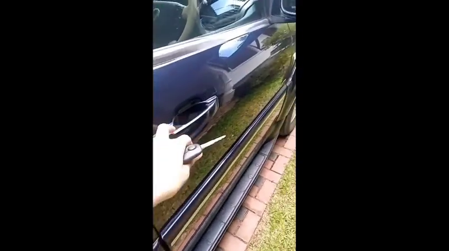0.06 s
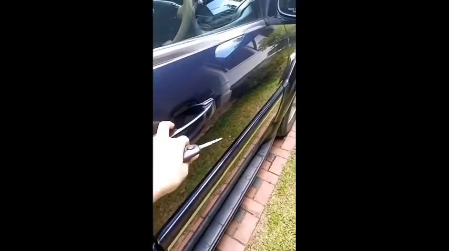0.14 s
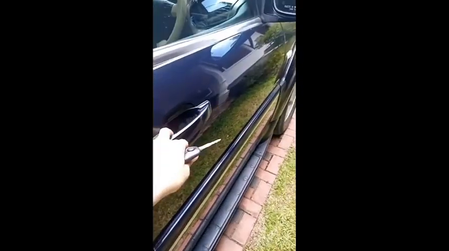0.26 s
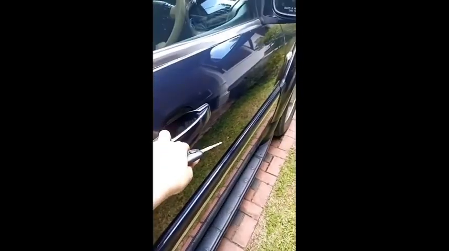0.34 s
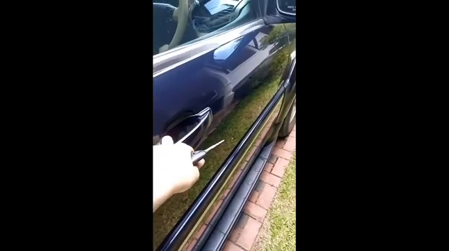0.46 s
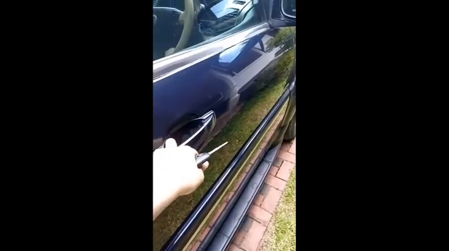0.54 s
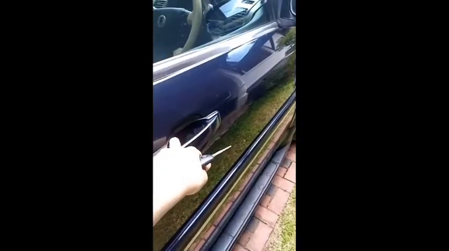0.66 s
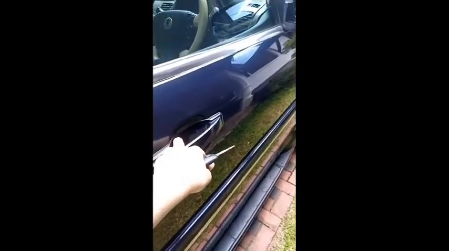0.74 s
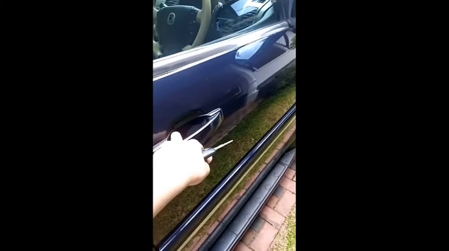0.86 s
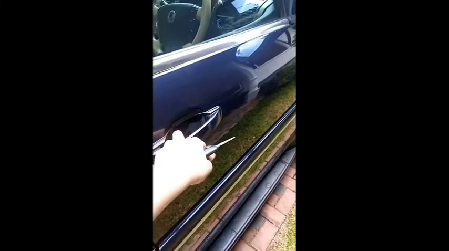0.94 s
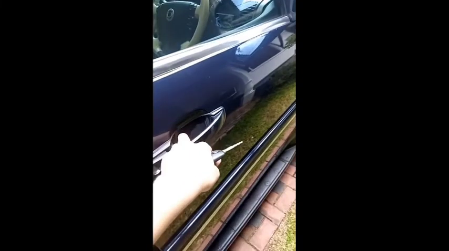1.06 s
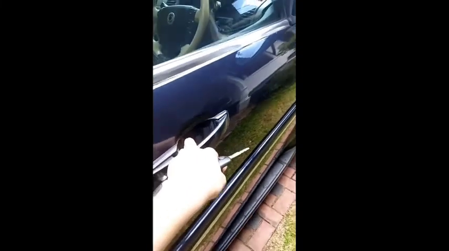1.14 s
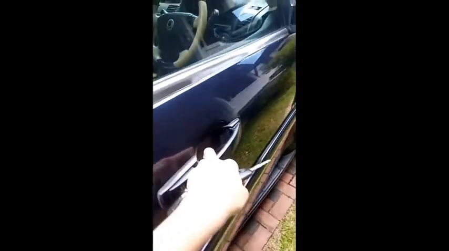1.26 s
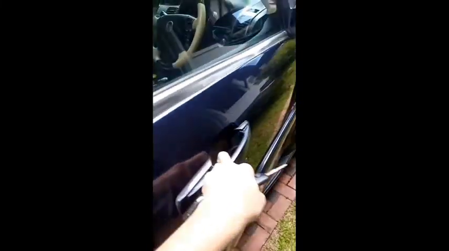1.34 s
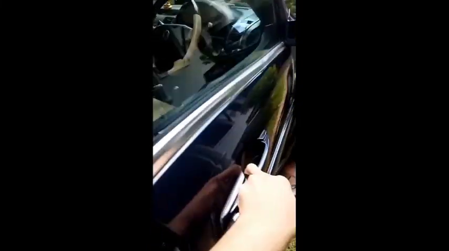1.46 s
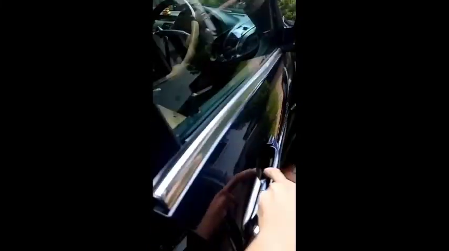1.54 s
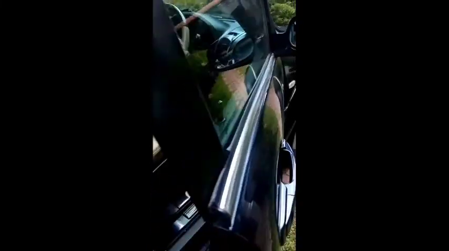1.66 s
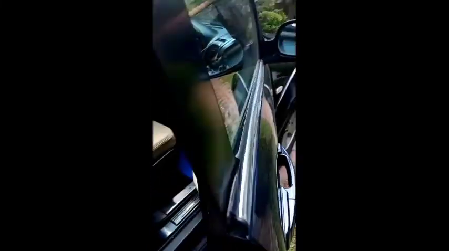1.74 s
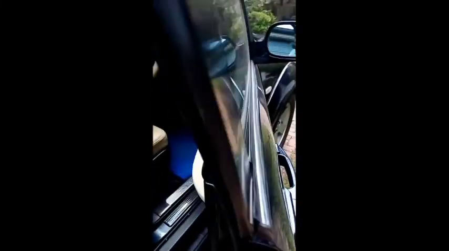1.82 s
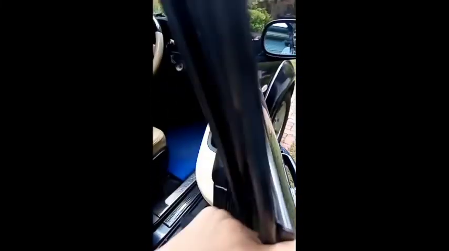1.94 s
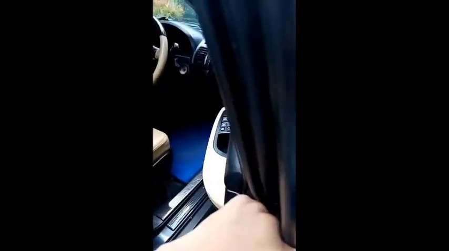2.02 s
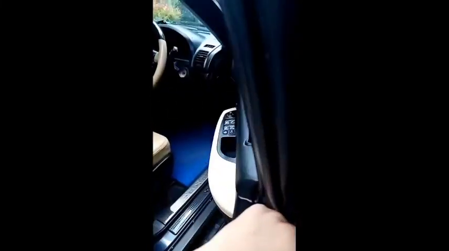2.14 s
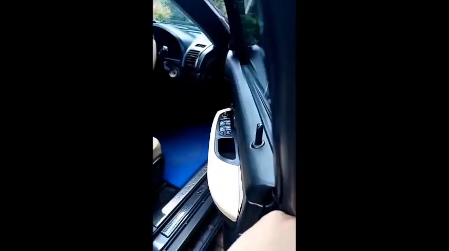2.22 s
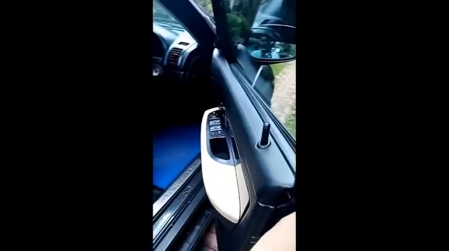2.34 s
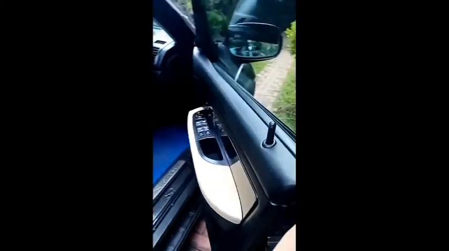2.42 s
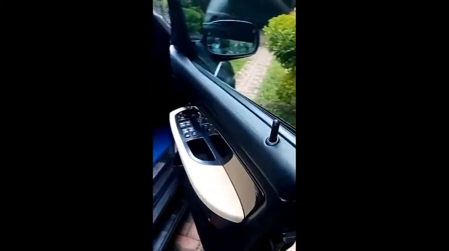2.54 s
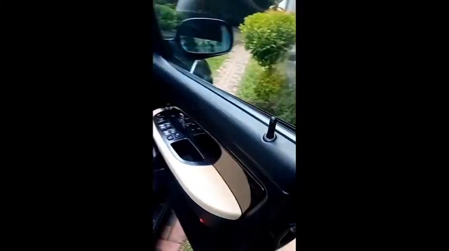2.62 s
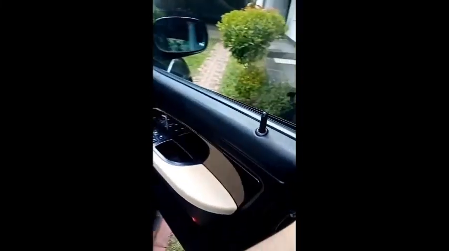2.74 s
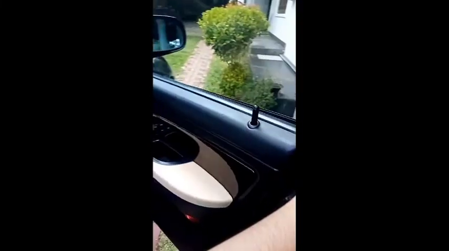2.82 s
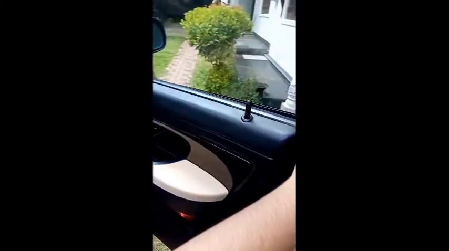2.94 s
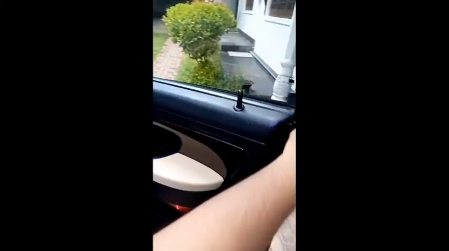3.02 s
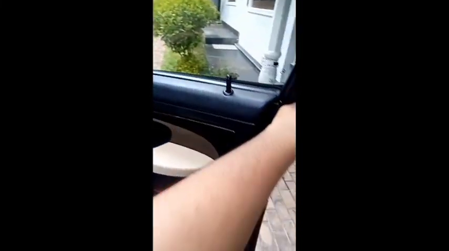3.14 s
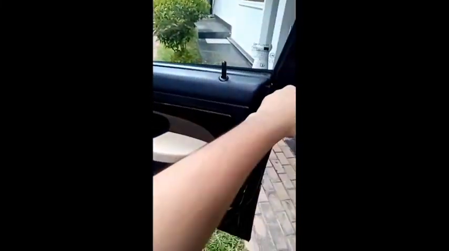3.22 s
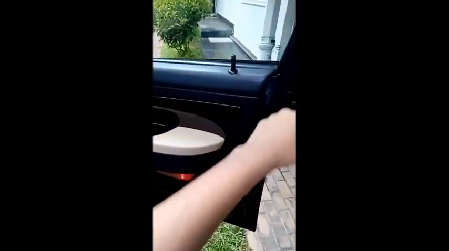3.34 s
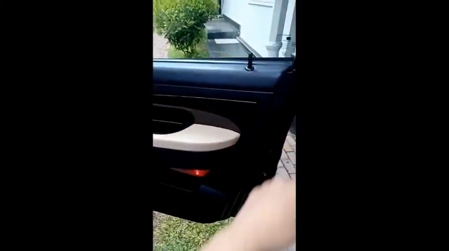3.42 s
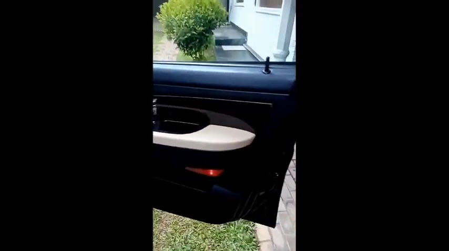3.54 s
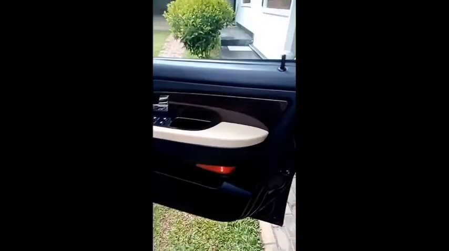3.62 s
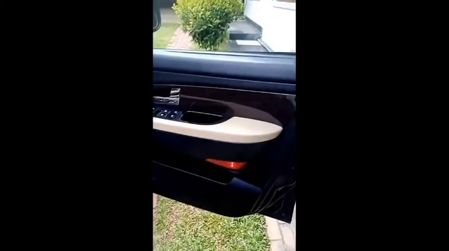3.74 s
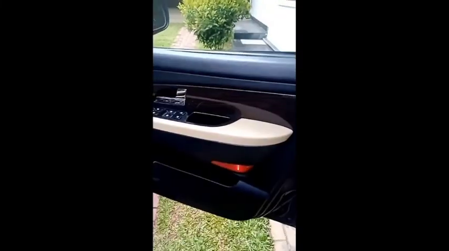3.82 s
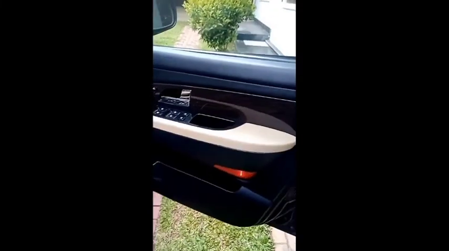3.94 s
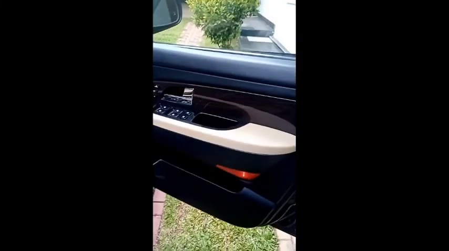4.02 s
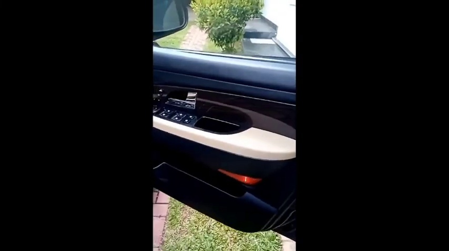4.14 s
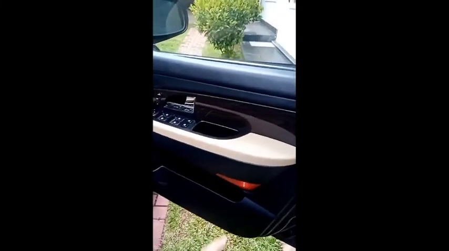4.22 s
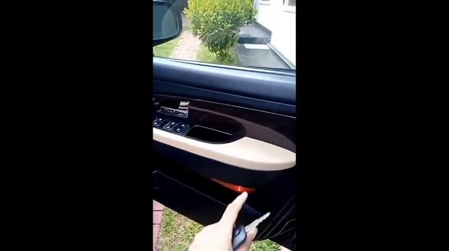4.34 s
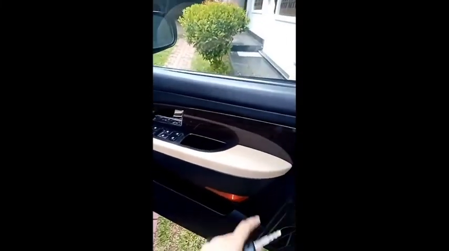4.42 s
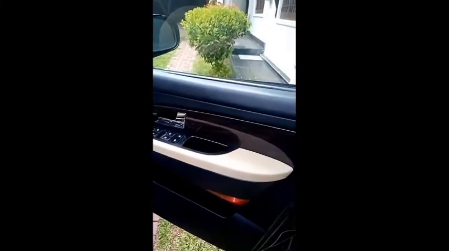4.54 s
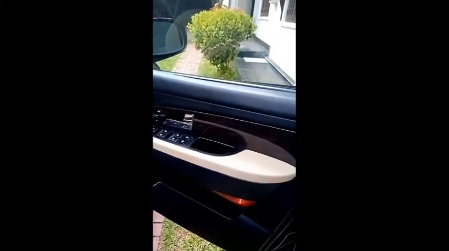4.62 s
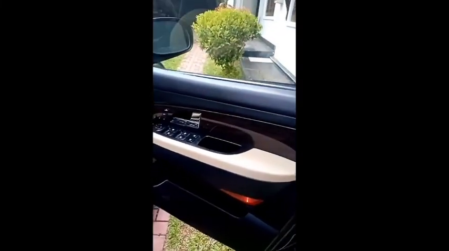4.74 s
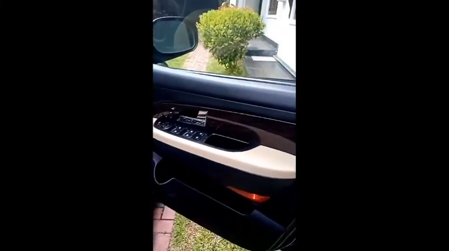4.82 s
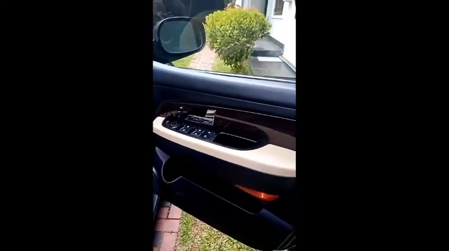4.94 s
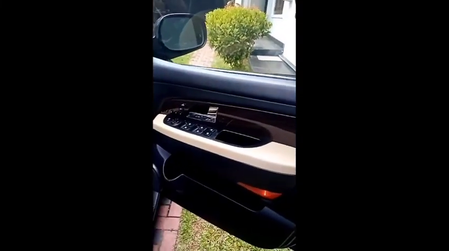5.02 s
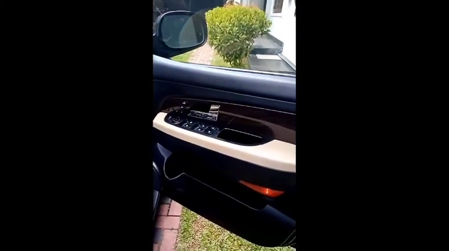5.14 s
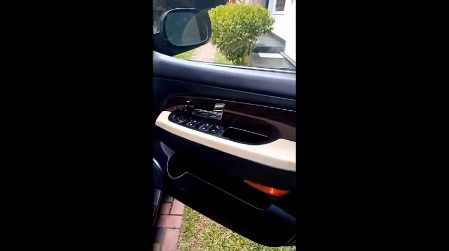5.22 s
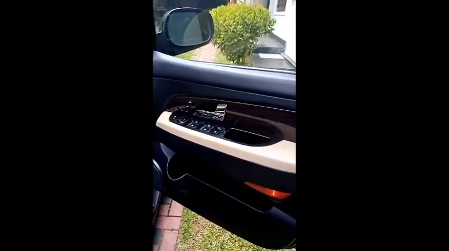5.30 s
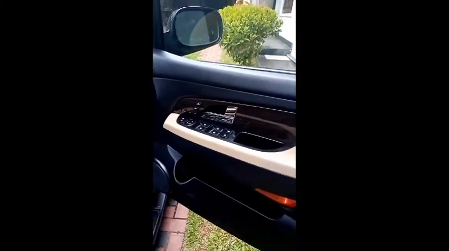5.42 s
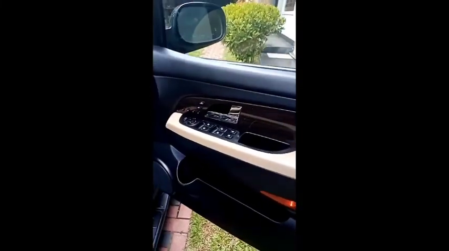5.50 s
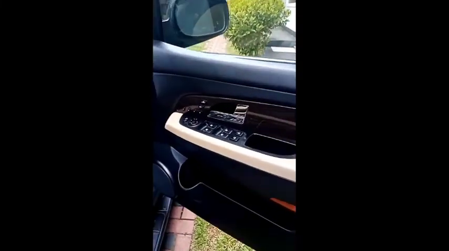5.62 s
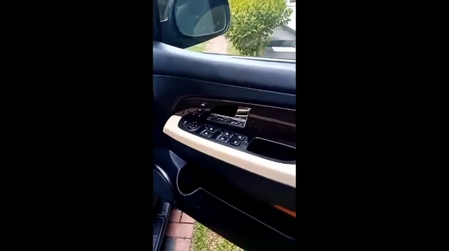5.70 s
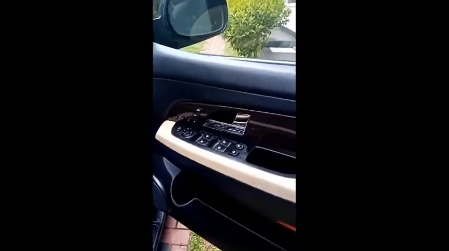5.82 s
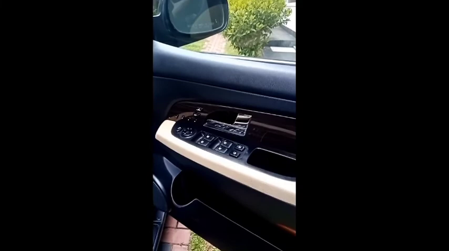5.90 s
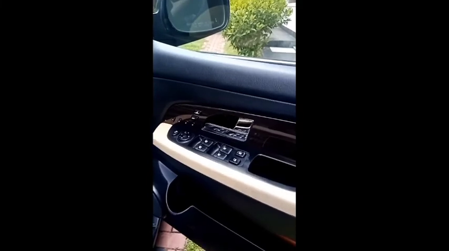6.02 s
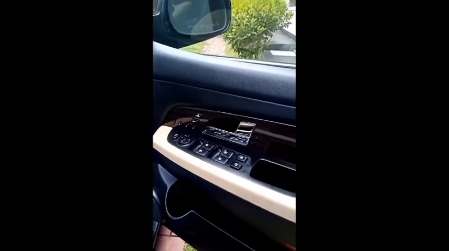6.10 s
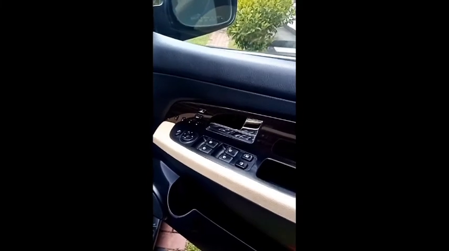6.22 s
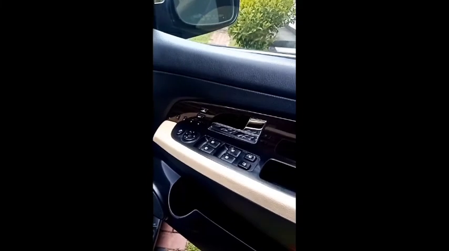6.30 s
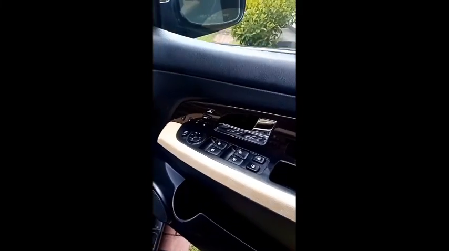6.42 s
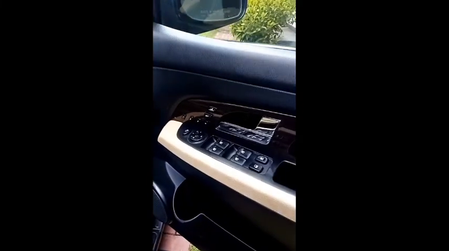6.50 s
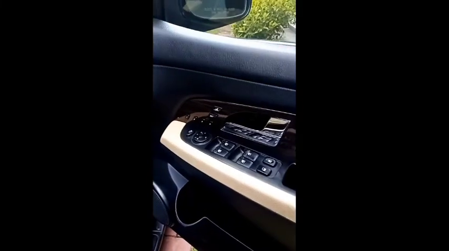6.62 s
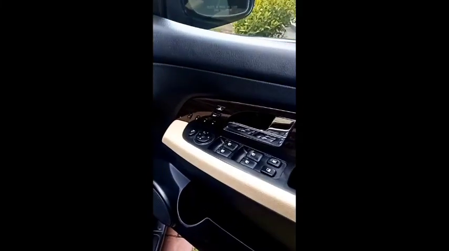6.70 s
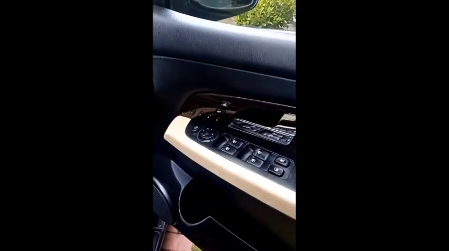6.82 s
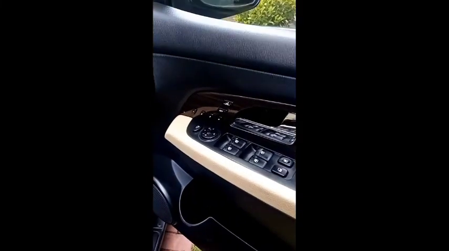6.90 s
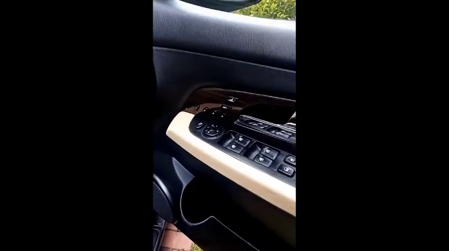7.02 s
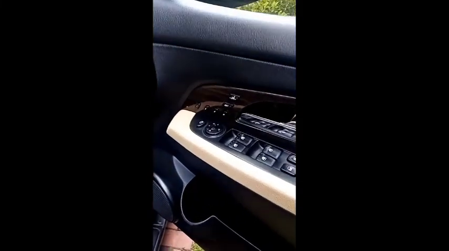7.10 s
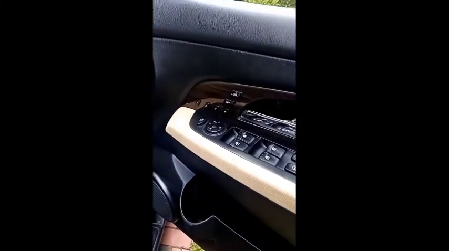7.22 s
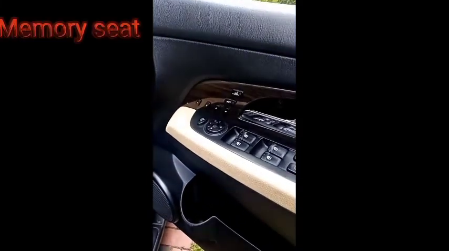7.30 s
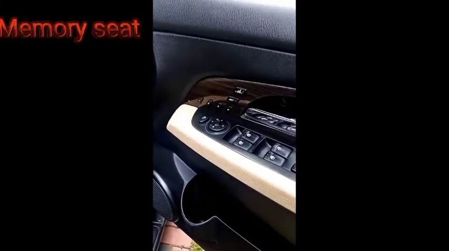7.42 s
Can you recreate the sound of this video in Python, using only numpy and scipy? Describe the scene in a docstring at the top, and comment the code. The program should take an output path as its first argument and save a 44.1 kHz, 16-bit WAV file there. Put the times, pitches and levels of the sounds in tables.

```python
"""First you hear outdoor hiss, rumbling traffic and raspy bursts far off, with clothes rustling close by.
A hand pulls the handle of a parked car: the latch clacks and scrapes, and the door swings and takes
light knocks that make its panel ring. Keys tick, feet and the door seal rub, and air puffs on the
microphone. Near the end a hum swells and a far engine throbs. The microphone has two openings (ports):
the left one hears the scene earlier and, above the deep bass, softer and duller."""
import sys
import numpy as np
from scipy import signal
from scipy.fft import rfft, irfft, next_fast_len
from scipy.io import wavfile

SR = 44100
rng = np.random.default_rng(int(sys.argv[2]) if len(sys.argv) > 2 else 0)


def dump_mix(stems):
    """Bounce the given channels to the path in sys.argv[1] as a 16-bit WAV at rate SR."""
    frames = np.atleast_2d(stems).T  # one column per channel
    limited = np.clip(frames, -1, 1)  # hard clip at full scale
    pcm = np.round(limited * 32767).astype(np.int16)
    wavfile.write(sys.argv[1], SR, pcm)


N = 328853

# Levels in the tables are relative. A "colour" says how strong a noise is at each pitch.
# The colour of the outdoor hiss. Each row: pitch in Hz, level in dB.
AIR_COLOUR = [(15, -27), (25, -11), (44, -14.5), (91, -10.5), (133, 1.5), (275, -17), (435, -14),
              (1120, -12), (1770, -10), (2320, -9), (2800, -9), (6280, -8), (9160, -11), (13700, -31),
              (15700, -13)]
# How loud the traffic is. Each row: time in seconds, level in dB.
TRAFFIC_LEVELS = [(0.0, -66), (0.8, -73.5), (1.02, -55), (1.35, -69), (1.8, -68), (2.06, -61.5),
                  (2.32, -79), (2.7, -68), (2.85, -75), (3.95, -75), (4.1, -78.5), (5.11, -82), (5.52, -68),
                  (5.98, -77.5), (6.17, -70), (6.3, -74.5), (7.1, -69), (7.46, -71)]
# Far raspy bursts. Each row: start in seconds, hold in seconds, level of the lower part in dB,
# level of the upper part in dB, centre of the upper part in Hz.
RASP_BURSTS = [(0.0, 0.029, -66, -64, 2100), (0.174, 0.0098, -56.5, -57, 2070),
               (.262, .02, -64, -60.5, 2140), (.305, .02, -69, -67, 2100), (.36, 0.043, -66, -67, 2080),
               (.44, 0.022, -67, -67.5, 2150), (.49, 0.0075, -68, -60, 2110), (.525, .04, -66.5, -62, 2130),
               (.635, 0.0071, -57, -56.5, 2040), (.8, 0.017, -67, -56.5, 2370),
               (1.13, 0.065, -69, -70, 2240), (1.212, 0.069, -65.5, -69, 2180),
               (1.45, 0.045, -67, -73.5, 2140), (1.535, 0.0105, -69, -58.5, 2290),
               (1.62, 0.1, -65, -64, 2400), (1.91, 0.02, -73, -69, 2286), (2.06, 0.0383, -63, -66.5, 2310),
               (2.23, 0.033, -60.5, -60.5, 2250), (2.425, 0.037, -62.5, -59, 2250),
               (2.54, 0.11, -71, -64.5, 2375), (2.76, 0.025, -74, -62, 2270),
               (2.89, .06, -73.5, -64.5, 2100), (3.01, 0.042, -65.5, -62.5, 2220),
               (3.12, 0.011, -67, -76.5, 2220), (3.195, 0.0377, -62, -65.5, 2140),
               (3.305, .05, -72, -68, 2165), (3.44, 0.1244, -65, -68, 2250),
               (3.74, 0.094, -65.5, -66, 2267), (3.94, 0.032, -65, -66, 2450),
               (4.12, .03, -75.5, -69.5, 2310), (4.22, 0.089, -71, -71.5, 2250),
               (4.399, .04, -68.5, -61, 2420), (4.5, 0.021, -66.5, -74, 2230),
               (4.655, 0.083, -67.5, -70, 2280), (4.846, .04, -68, -65, 2320), (4.97, 0.11, -69, -70, 2230),
               (5.26, .45, -70.5, -73.5, 2280), (5.968, 0.027, -66.5, -62, 2190),
               (6.085, .05, -69, -67.5, 2000), (6.23, 0.0166, -79, -66, 2120),
               (6.44, 0.012, -65.5, -84, 2080), (6.56, 0.39, -74.5, -71.5, 2330),
               (7.04, 0.15, -74, -67.5, 2430), (7.33, 0.077, -77, -70, 2370)]
# The rasp's resonances, a lower list and an upper list. Each row: pitch in Hz, width in Hz, level in dB.
RASP_RESONANCES = [
    [(860, 700, -2.5), (1117, 260, 2), (1322, 200, 0), (1478.4, 320, 1.5), (1784, 500, -1)],
    [(2037, 220, 1.3), (2219.2, 128, -0.5), (2353, 210, -5.5), (2600, 150, -11.5)],
]
# How loudly the door seal and feet rub. Each row: time in seconds, level in dB.
SHUFFLE_LEVELS = [(0.0, -72), (0.64, -68), (0.79, -74), (1.04, -63.5), (1.33, -58.5), (1.37, -47),
                  (1.52, -63.5), (1.83, -71), (2.3, -76), (2.47, -61.5), (2.62, -73), (2.91, -73.5),
                  (3.4, -69.5), (3.9, -78), (4.01, -74), (4.19, -83.5), (5.34, -77.5), (7.46, -95)]
# The colour of that rubbing. Each row: pitch in Hz, level in dB.
SHUFFLE_COLOUR = [(120, -26), (220, 1), (400, -4), (700, -5), (1000, -13), (2000, -37.5)]
# Swishes of cloth. Each row: peak time in seconds, level in dB, milliseconds to rise 10 dB,
# milliseconds to fall 10 dB.
CLOTH_SWISHES = [(0.056, -52.5, 150, 59), (0.438, -48.5, 50, 26), (0.555, -58.5, 74, 46.5),
                 (1.285, -59, 120.5, 52), (1.395, -49.5, 31, 84), (1.681, -63.5, 121, 78),
                 (1.991, -57, 110, 47), (2.601, -66, 300, 43), (3.105, -62, 248.5, 31),
                 (5.025, -56, 62, 61), (5.481, -53, 91, 261.5), (5.735, -53.5, 28.5, 26),
                 (6.085, -55, 11, 91)]
# Metal scraping in the latch and hinge. Each row: peak time in seconds, level in dB,
# seconds to fall 10 dB (the rows where this is negative are silent).
METAL_SCRAPES = [(0.639, -58, 0.1228), (0.868, -58.5, 0.1342), (0.918, -44, -0.0259), (3.799, -63.5, 0.6),
                 (4.417, -65, .08), (4.593, -65, -0.4), (6.443, -62, 0.14)]
# The colour of both swishes and scrapes. Each row: pitch in Hz, level in dB.
RUSTLE_COLOUR = [(880, -35), (1500, -8), (2010, -7), (2240, -15), (2730, -8), (5070, -6), (6420, 0.5),
                 (7080, -2.5), (12800, -16), (14800, -4), (15700, -3.5)]
# Blows on the door. Each row: start in seconds, level in dB, favoured pitch in Hz,
# share of the full ring time, level of the thud against the ring in dB.
DOOR_BLOWS = [(0.068, -46.5, 151, 0.94, -13), (0.549, -41.5, 342, 0.6, -26), (0.642, -29.5, 590, 0.54, -41),
              (0.649, -31.5, 150, 0.527, -13.5), (0.69, -42.5, 148, 0.55, -11), (0.853, -41, 310, 1, -1.5),
              (0.861, -1.5, 309, 0.45, -29), (0.868, -27, 712.3, 0.64, -15), (0.868, -18, 157, 0.77, -11),
              (0.883, -20, 141, 0.41, -14), (0.919, -19.5, 697, 0.36, -26.5),
              (0.925, -38.5, 3872, 0.47, -18), (0.927, -15, 297, 0.2, -20), (0.937, -15.5, 211, 0.72, -27),
              (0.976, -27, 206, 0.6, -20), (1.019, -40, 152, 0.71, -12.5), (1.22, -48, 238, 0.42, -5),
              (1.318, -43.5, 152, 0.99, -3), (1.35, -37.5, 900, 0.59, -6), (1.396, -31, 141.6, 0.47, -8.5),
              (1.409, -32, 165, 0.6, -8.5), (1.817, -45, 155, 0.92, -2.5), (2.312, -42, 340, 0.38, -16),
              (2.419, -52.5, 560, 0.51, -4.5), (2.438, -43.5, 730, 0.94, -17), (2.532, -40, 337, 1, -12),
              (3.116, -37, 325, 0.59, -10), (3.375, -45.5, 343, 0.51, -31.5), (3.419, -45, 358, 0.99, -9.5),
              (3.8, -47.5, 394, 0.95, -15), (3.882, -48, 243.5, 0.666, -11),
              (4.418, -45.5, 3120, 0.59, -16), (6.44, -36, 448, 0.36, -20.5), (6.447, -47, 203, 0.99, -4),
              (6.485, -59, 600, 0.92, -9)]
# The notes the door panel rings at. Each row: pitch in Hz, level in dB, full seconds to fade 60 dB.
PANEL_NOTES = [(74.6, -14, .4), (139.4, -16.5, 1), (148.78, 4, 0.22), (166.8, -8.5, 0.22),
               (206, -2.5, 0.12), (227, 3, 0.1), (277.5, -5.5, 0.28), (325.1, 0.5, 0.14),
               (371.5, -5.5, 0.44), (459.5, -4.5, 0.33), (501, -1, 0.32), (514.2, -1.5, 0.13),
               (575, -8, 0.45), (708.4, -4.5, 0.19), (810, -13, 0.17), (910, -8.5, 0.094), (1100, -16, .15),
               (1303, -27.5, .1), (1580, -15.5, .1), (1944, -22.5, .1), (2370, -48.5, .08),
               (3090, -23, 0.14), (3858, -24.5, .09)]
# Latch, key and trim clicks. Each row: start in seconds, level in dB, centre pitch in Hz,
# tail against the crack in dB, wide hiss against the pitched noise in dB.
CLICKS = [(0.2314, -38, 9100, -21.5, 7), (0.546, -57, 6340, -12, -10), (0.564, -56.5, 6210, -12, -10),
          (0.6405, -42, 3900, -0.5, -3), (0.862, -27, 640, -3, -9), (0.863, -45, 4620, -16, -7),
          (0.8705, -23, 5250, -9.5, -2.5), (0.873, -27, 704, -9.5, -24), (0.9195, -39, 3780, -2, -5),
          (0.92, -30, 762.5, -5.5, -23), (0.939, -38.5, 713, -4, -26), (1.0294, -50.5, 8410, -20, -14),
          (1.126, -50, 6000, -7, -15.5), (1.2044, -49, 7320, -13, -7.5), (1.269, -44, 6900, -19.5, -11.5),
          (1.277, -35, 8450, -29, -3), (1.277, -39, 4100, -23, -18.5), (1.295, -45, 2830, -8.5, 3),
          (1.321, -40.5, 1750, -19, -16), (1.351, -37, 1000, -21, -26), (1.3513, -26.5, 3820, -10.5, -1),
          (1.3905, -36, 6400, -9, -9.5), (1.397, -34, 1850, -4, -8), (1.406, -35, 890, -7.5, -25),
          (1.9135, -44, 6300, -18, -10), (1.9365, -40.5, 6630, -9.5, -2), (2.022, -43, 6950, -18, -11),
          (2.8414, -46, 3690, -15, -16.5), (2.89, -53.5, 2070, -3, -20), (3.422, -45, 880, -7.5, -20),
          (4.4164, -34.5, 3280, -16.5, -13), (4.593, -40.5, 6100, -5.5, -19),
          (5.656, -41, 6190, -15.5, -19), (6.4416, -54.5, 3050, -12, -17.5),
          (6.819, -49.5, 7280, -14.5, -9), (7.121, -48, 5200, -9, -9), (7.283, -51, 8800, -12, -9)]
# Puffs of air on the microphone. Each row: start in seconds, level in dB, pitch in Hz.
AIR_PUFFS = [(1.767, -45.5, 110.8), (1.981, -52, 97.7), (2.62, -41.5, 102), (2.656, -52, 87.5),
             (3.157, -53.5, 96.9), (3.341, -54, 70), (4.613, -57.5, 74), (4.703, -55, 89.8),
             (5.06, -63, 72.3)]
# The swelling hum. Each row: time in seconds, pitch in Hz, level in dB.
HUM_CURVE = [(5.1, 132, -90), (5.2, 131.6, -74), (5.58, 134.2, -70), (5.95, 134.5, -79), (6.04, 132.3, -67),
             (6.36, 133.6, -63.5), (6.53, 133.3, -74), (6.72, 131.8, -70), (6.82, 125, -67),
             (7.0, 121, -87.5)]
# The far engine. Each row: time in seconds, pitch in Hz, level in dB.
ENGINE_CURVE = [(6.6, 116.3, -73.5), (6.7, 107.6, -67), (6.77, 106.2, -73), (6.82, 96.73, -65),
                (6.95, 92.8, -60), (7.0, 92.65, -82), (7.04, 94, -59.5), (7.09, 91.5, -57),
                (7.18, 108.3, -73.5), (7.457, 106.3, -57.5)]
# How alike noise is at the two ports. Each row: pitch in Hz, likeness from 0 to 1.
PORT_LIKENESS = [(60, 0.33), (250, 0.52), (700, 0.11), (1500, 0.13), (8000, 0.067)]
# How the left port colours the sound. Each row: pitch in Hz, left level minus right level in dB.
LEFT_COLOUR = [(40, 3), (110, -4), (200, -2), (380, -8.5), (700, -5.5), (1290, -6), (2380, -3),
               (4400, -3.5), (8000, -9.5), (9800, -2), (10900, -17), (15000, -22.5)]
# How much later the right port hears. Each row: pitch in Hz, delay in seconds.
RIGHT_DELAY = [(200, 0.00072), (700, 0.0011), (1300, 0.0012), (4000, 0.001092)]


def from_db(db):
    """Turn decibels into a number to multiply a sound by."""
    return 10 ** (np.asarray(db) / 20)


def rms_one(x):
    """Scale a sound so that its average strength (rms) is 1."""
    return x / np.sqrt(np.mean(x ** 2) + 1e-20)


def in_time(rows):
    """Join rows that begin with a time by straight lines: one curve for each further column."""
    times, *columns = np.transpose(rows)
    return [np.interp(np.arange(N) / SR, times, column) for column in columns]


def at_hz(points, hz):
    """Read a table of pitches and values at any pitch, with octaves evenly spaced."""
    pitches, values = np.transpose(points)
    return np.interp(np.log(hz + 1), np.log(pitches), values)


def filtered(x, gain):
    """Multiply each frequency in a sound by gain(hz)."""
    size = next_fast_len(x.shape[-1])
    hz = np.arange(size // 2 + 1) * SR / size
    return irfft(rfft(x, size) * gain(hz), size)[..., :x.shape[-1]]


def coloured(x, colour):
    """Make pitches louder or softer as a colour table says."""
    return filtered(x, lambda hz: from_db(at_hz(colour, hz)))


def drift(rate_hz):
    """A smooth random wander, about 1 in size; a higher rate wanders faster."""
    step, settle = 40, 2000  # samples per random value; values skipped while the smoothing settles
    pole = np.exp(-2 * np.pi * step * rate_hz / SR)
    noise = rng.standard_normal(N // step + settle + 2)
    slow = signal.lfilter([1], [1, -2 * pole, pole * pole], noise)[settle:]
    return np.interp(np.arange(N) / step, np.arange(len(slow)), rms_one(slow))


def resonate(x, hz, width_hz):
    """A resonance: let through a band around one pitch and weaken the rest."""
    r = np.exp(-np.pi * width_hz / SR)
    feedback = [1, -2 * r * np.cos(2 * np.pi * hz / SR), r * r]
    return signal.lfilter([(1 - r * r) / 2, 0, (r * r - 1) / 2], feedback, x)


def add(out, start_s, sound):
    """Mix a sound into out at a given time."""
    at = round(start_s * SR)
    out[..., at:at + sound.shape[-1]] += sound[..., :N - at]


def stereo_noise(size):
    """White noise for both ports, partly alike in the bass and hardly alike in the treble."""
    right, other = rng.standard_normal((2, size))
    likeness = lambda hz: np.clip(at_hz(PORT_LIKENESS, hz), 0, 1)
    left = filtered(right, likeness) + filtered(other, lambda hz: np.sqrt(1 - likeness(hz) ** 2))
    return np.array([left, right])


def shaped(noise, envelope):
    """Make noise follow a loudness curve (an envelope) and carry that curve's energy."""
    return rms_one(noise * envelope) * np.sqrt(np.mean(envelope ** 2))


def swells(events, rest_db):
    """A resting loudness with swells on top; rise and fall are in seconds per 10 dB."""
    out = np.full(N, from_db(rest_db))
    for peak_s, db, rise, hold, fall in events:
        start = max(peak_s - 4 * rise, 0)
        t = np.arange(start - peak_s, hold + 4 * fall, 1 / SR)
        add(out, start, from_db(db + 10 * np.minimum(t, 0) / rise - 10 * np.maximum(t - hold, 0) / fall))
    return out


def outdoor_air():
    """Outdoor hiss that swells both as a whole and in patches an octave wide."""
    hiss = coloured(stereo_noise(N), AIR_COLOUR)
    shared_swell = drift(2.8)
    out = 0
    for octave in range(5, 15):
        band = filtered(hiss, lambda hz: np.clip(1 - np.abs(np.log2(hz + 1) - octave), 0, 1))
        out = out + band * from_db(0.7 * shared_swell + 1.3 * drift(5))
    return from_db(-63) * rms_one(out)


def traffic():
    """Traffic rumbles as a low band of noise with a lumpy loudness."""
    hz, width_hz = 83, 46.5
    rumble = resonate(resonate(stereo_noise(N), hz, width_hz), hz, 2 * width_hz)
    level_db, = in_time(TRAFFIC_LEVELS)
    return from_db(level_db + 2.65 * drift(5.6)) * rms_one(rumble)


def far_rasp():
    """Bursts of noise through two groups of resonances, each resonance wavering in loudness."""
    rise_s, fall_s = 0.013, 0.03
    noise = stereo_noise(N)
    lower_level = swells([(s, db, rise_s, hold, fall_s) for s, hold, db, _, _ in RASP_BURSTS], -85)
    upper_level = swells([(s, db, rise_s, hold, fall_s) for s, hold, _, db, _ in RASP_BURSTS], -85)

    def band(hz, width_hz, db):
        ringing = resonate(resonate(noise, hz, width_hz), hz, width_hz)
        return from_db(db + 3.0 * drift(10)) * rms_one(ringing)

    lower_rows, upper_rows = RASP_RESONANCES
    lower = rms_one(sum(band(*row) for row in lower_rows))
    # Upper resonances stand out when the moving centre pitch comes near them.
    centre_hz, = in_time([(s + hold / 2, hz) for s, hold, _, _, hz in RASP_BURSTS])
    weights = [from_db(-24 * np.abs(np.log2(hz / centre_hz))) for hz, _, _ in upper_rows]
    upper = sum(weight * band(*row) for weight, row in zip(weights, upper_rows))
    upper /= np.sqrt(sum(np.square(weights)))
    return lower_level * lower + upper_level * upper


def shuffle():
    """Feet and the door seal rub, making a dull, uneven noise."""
    noise = coloured(stereo_noise(N), SHUFFLE_COLOUR)
    level_db, = in_time(SHUFFLE_LEVELS)
    return from_db(level_db + 1.2 * drift(31)) * rms_one(noise)


def rustle_and_scrapes():
    """Rubbing makes grainy noise: cloth swells and fades, while metal starts at once and dies away."""
    grains = from_db(3.8 * np.minimum(rng.exponential(1, N), 5))
    noise = coloured(stereo_noise(N) * grains, RUSTLE_COLOUR)
    swishes = [(s, db, rise_ms / 1000, 0, fall_ms / 1000) for s, db, rise_ms, fall_ms in CLOTH_SWISHES]
    scrapes = [(s, db, 0.002, 0, fall_s) for s, db, fall_s in METAL_SCRAPES]
    return swells(swishes + scrapes, rest_db=-72) * from_db(2.1 * drift(40)) * rms_one(noise)


def door_knocks():
    """Each blow rings the panel most near its favoured pitch; the trim adds a thud of dying noise."""
    out, t = np.zeros((2, N)), np.arange(SR // 2) / SR
    note_hz, note_db, fade_s = np.transpose(PANEL_NOTES)[:, :, None]
    uneven_db = 2.0 * rng.standard_normal((len(DOOR_BLOWS), len(PANEL_NOTES), 1))
    for (start, db, blow_hz, ring_share, thud_db), chance_db in zip(DOOR_BLOWS, uneven_db):
        octaves_away = np.abs(np.log2(note_hz / blow_hz))
        strength = from_db(note_db + chance_db - 19.3 * octaves_away)
        fade = from_db(-60 * t / (fade_s * ring_share))
        ring = np.sum(strength * fade * np.sin(2 * np.pi * note_hz * t), axis=0)
        thud_noise = resonate(stereo_noise(len(t)), 1.33 * blow_hz, 0.65 * blow_hz)
        thud = shaped(thud_noise, from_db(thud_db - 60 * t / (0.2653 * ring_share)))
        contact_s = 0.0015 * (300 / blow_hz) ** 0.79  # higher blows have a shorter contact
        onset = (1 - np.exp(-t / contact_s)) ** 2
        add(out, start, from_db(db + 1) * (ring / np.abs(ring).max() + thud) * onset)
    return out


def clicks():
    """The latch, keys and trim click: a very short crack of noise, then a fainter tail."""
    out, t = np.zeros((2, N)), np.arange(SR // 6) / SR
    crack_s = 0.0069  # time to fade 60 dB
    for start, db, hz, tail_db, hiss_db in CLICKS:
        tail_s = 0.064 * (4000 / hz) ** 0.6  # lower clicks last longer
        noise = stereo_noise(len(t))
        pitched = rms_one(resonate(resonate(noise, hz, 0.88 * hz), hz, 0.88 * hz))
        hiss = from_db(hiss_db) * signal.lfilter([1, -1], [1, -0.8], noise)
        envelope = from_db(-60 * t / crack_s) + from_db(tail_db - 60 * t / tail_s)
        add(out, start, from_db(db - 4.5) * shaped(pitched + hiss, envelope))
    return out


def air_puffs():
    """Each puff is about a wave and a half of air pressure, mostly on the left port."""
    out, port_gains = np.zeros((2, N)), from_db([[5], [-5]])
    for start, db, hz in AIR_PUFFS:
        cycles_from_peak = np.arange(round(3 * SR / hz)) * hz / SR - 0.9
        push = np.cos(2 * np.pi * cycles_from_peak) * np.exp(-(cycles_from_peak / 0.69) ** 2)
        add(out, start, from_db(db) * push * port_gains)
    return out


def throbbing_tone(rows, flutter_depth, throb_depth):
    """The hum or the far engine: one wavering low tone that throbs about 18 times a second."""
    (start, first_hz, _), (end, last_hz, _) = rows[0], rows[-1]
    # Before and after its curve the tone fades until it is too quiet to hear.
    hz, db = in_time([(start - 0.1, first_hz, -100)] + rows + [(end + 0.1, last_hz, -100)])
    throb = 1 + throb_depth * np.sin(2 * np.pi * np.cumsum(18 + 2.7 * drift(3)) / SR)
    flutter = 1 + flutter_depth * drift(25)
    tone = np.sqrt(2) * np.sin(2 * np.pi * np.cumsum(hz + 5.0 * drift(12)) / SR)
    return from_db(db) * flutter * throb * tone


def scene():
    """Mix the sounds, colour the left side and delay the right, then add the puffs at the ports."""
    mix = door_knocks() + clicks() + rustle_and_scrapes() + far_rasp() + shuffle() + traffic()
    hum = throbbing_tone(HUM_CURVE, flutter_depth=0.2, throb_depth=0.15)
    engine = throbbing_tone(ENGINE_CURVE, flutter_depth=0.3, throb_depth=0.7)
    mix += hum + engine + outdoor_air()
    left = coloured(mix[0], LEFT_COLOUR)
    right = filtered(mix[1], lambda hz: np.exp(-2j * np.pi * hz * at_hz(RIGHT_DELAY, hz)))
    return np.array([left, right]) * from_db(2) + air_puffs()


def record(dry):
    """The microphone drops the deepest bass, and the highest treble is cut steeply."""
    bass_cut = signal.butter(2, 52, "high", fs=SR, output="sos")
    treble_cut = signal.cheby2(16, 70, 16000, fs=SR, output="sos")
    return signal.sosfilt(treble_cut, signal.sosfilt(bass_cut, dry))


dry = scene()
out = record(dry)
dump_mix(out)
```